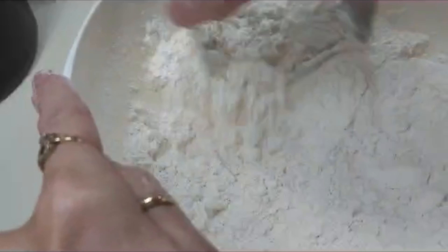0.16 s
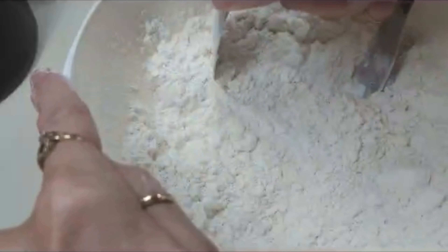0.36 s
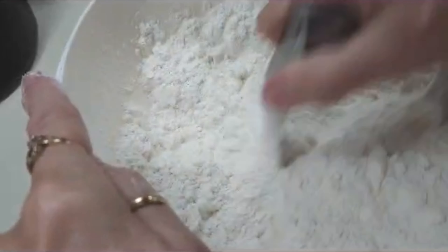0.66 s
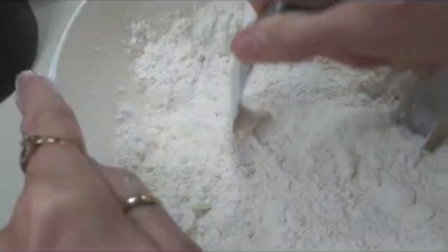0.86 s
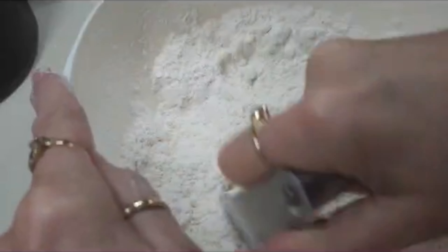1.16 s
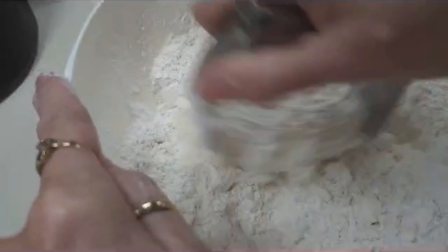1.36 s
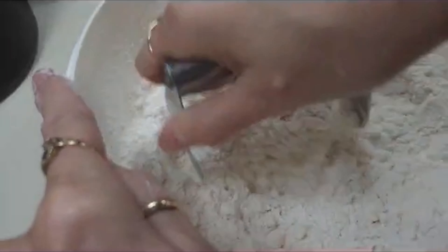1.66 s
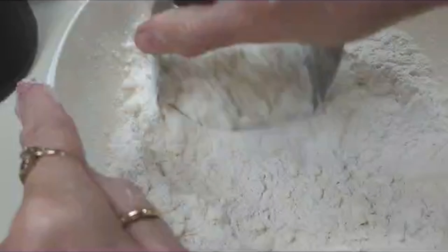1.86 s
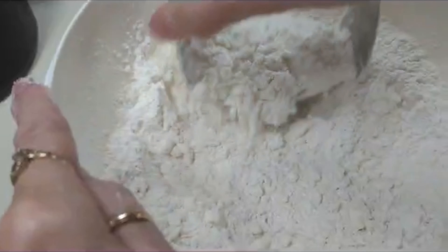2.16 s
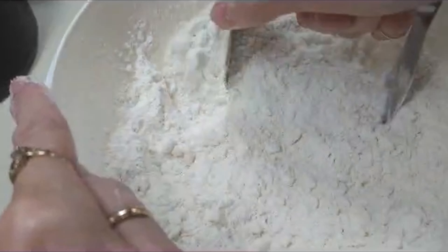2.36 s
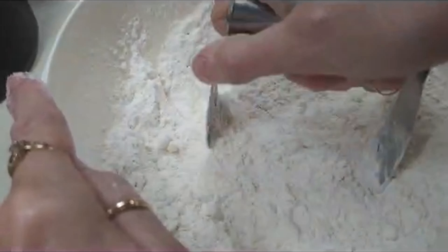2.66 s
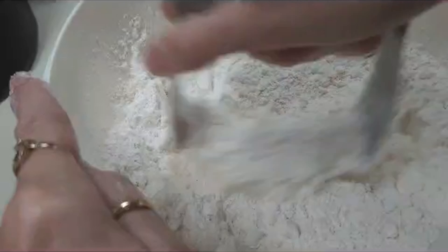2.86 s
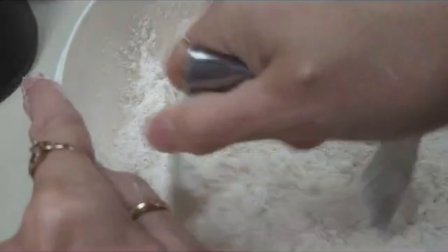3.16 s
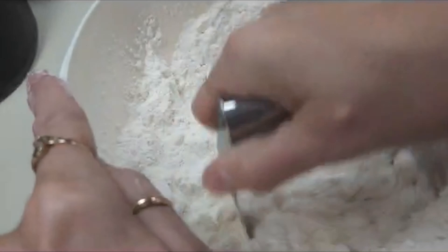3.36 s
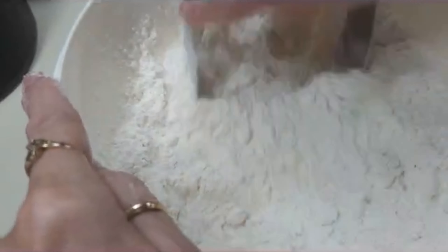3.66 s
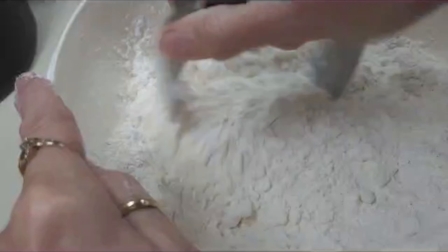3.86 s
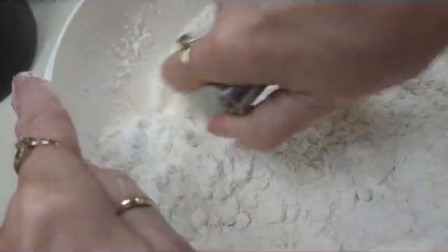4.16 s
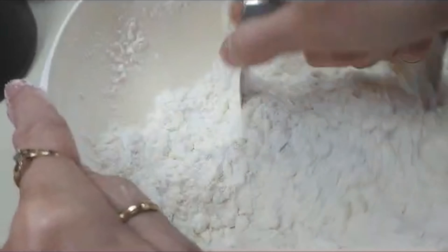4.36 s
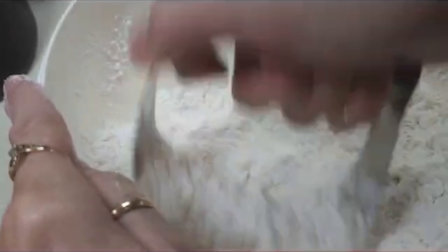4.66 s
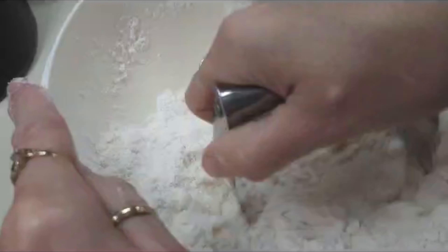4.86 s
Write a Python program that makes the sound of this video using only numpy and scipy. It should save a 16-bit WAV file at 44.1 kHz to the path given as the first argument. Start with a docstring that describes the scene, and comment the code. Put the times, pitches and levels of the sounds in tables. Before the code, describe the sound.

Close in a kitchen, metal blades crunch and rub through butter and flour, two heavy knocks early on, lighter strokes and a hissing scrape later.

```python
"""In a kitchen, heard from close by, a steel pastry blender cuts butter into flour in a hand-held bowl on a counter.
Gains for plunges and pushes drive grainy noise: squashed butter, crunching crumbs, hissing flour, with singing steel.
Blows on the bowl and blades are decaying modes with a noisy crack; thuds on the counter are slow damped swings.
Near the end the blades drag a long way through the flour and the bowl taps back into place.
A low rumble follows the load on the butter, and a short diffuse echo and quiet background surround it all."""
import sys
import numpy as np
from scipy import signal
from scipy.fft import rfft, irfft, next_fast_len
from scipy.io import wavfile

SR = 44100
rng = np.random.default_rng(int(sys.argv[2]) if len(sys.argv) > 2 else 0)


def wav_out(sig):
    """Save sig, one row per channel (or a flat mono array), as 16-bit PCM at SR to the path in sys.argv[1]."""
    wavfile.write(sys.argv[1], SR, np.round(np.clip(np.atleast_2d(sig).T, -1, 1) * 32767).astype(np.int16))


N = 221161
TIME = np.arange(N) / SR  # seconds
AGE = TIME[:SR // 2]  # seconds since a blow

# Modes of the loaded bowl. Each row: frequency in Hz, level in dB, full ring time (t60) in seconds.
BOWL_MODES = [(195, -1, 0.049), (240, -0.5, 0.11), (344.7, 0.5, 0.12), (382.7, -9.5, 0.099),
              (412, -20.5, 0.23), (432, -9.5, 0.15), (542.5, -3, 0.12), (670, -2.5, 0.058), (693, -5, 0.18),
              (787, -7, 0.19), (889, 1, 0.028), (1088, -16, 0.096), (1215, -2, .07), (1370, -4.5, 0.13)]
# Modes of the blades, damped by hand and dough. Each row: frequency in Hz, level in dB, full ring time (t60) in seconds.
BLADE_MODES = [(970, -7.5, 0.034), (1137, 1.5, 0.025), (1640, -12, 0.073), (1880, -1.5, 0.012),
               (2213, -14, 0.093), (2154, 6.5, 0.0091), (2430, -1.5, 0.02), (2650, -5.5, 0.02),
               (2847, -10.5, 0.1), (3060, -9.5, 0.018), (4050, -22.5, .03), (4670, 1, 0.013),
               (5500, 9.5, 0.0032), (6640, 3.5, 0.0069), (7260, -2.5, .015)]
# Colour of breaking crumbs. Each row: frequency in Hz, level in dB.
CRUNCH_COLOUR = [(400, -24), (620, -6), (820, -1.5), (1050, -1), (1400, -3), (1800, -2), (2150, -1),
                 (2600, -4), (3400, -9.5), (4800, -18)]
# How alike left and right are. Each row: frequency in Hz, likeness (1 = the same, 0 = unrelated).
EAR_LIKENESS = [(100, 1), (250, 0.96), (500, 0.59), (1000, 0.098), (2500, 0), (8000, 0), (15000, 0)]


def from_db(db):
    """Turns decibels into an amplitude factor."""
    return 10 ** (np.asarray(db) / 20)


def rms_one(x):
    """Scales a signal to rms 1."""
    return x / np.sqrt(np.mean(x ** 2) + 1e-20)


def attack_one(x):
    """Scales a blow to rms 1 over its first 5 ms."""
    return x / np.sqrt(np.mean(x[..., :SR // 200] ** 2) + 1e-20)


def at_hz(points, hz):
    """Reads a table of (Hz, value) at any frequency, on a logarithmic frequency scale."""
    table_hz, values = np.array(points)[:, :2].T
    return np.interp(np.log(np.maximum(hz, 1)), np.log(table_hz), values)


def band(x, low_hz, high_hz, order=2):
    """Keeps the band between two frequencies, at least a tenth of the lower one wide."""
    high_hz = min(max(high_hz, low_hz * 1.1), .47 * SR)
    return signal.sosfilt(signal.butter(order, [low_hz, high_hz], "band", fs=SR, output="sos"), x)


def add(out, s, sound):
    """Lays a sound into the mix at time s."""
    start = max(round(s * SR), 0)
    out[:, start:start + sound.shape[-1]] += sound[..., :N - start]


def panned(sound, left_db):
    """Makes the left louder than the right by left_db."""
    return sound * from_db([[left_db / 2], [-left_db / 2]])


def spread(pair, spectrum=None):
    """Two unrelated signals become left and right, alike in the bass and coloured by a spectrum; rms 1."""
    count = pair.shape[-1]
    size = next_fast_len(count)
    hz = np.arange(size // 2 + 1) * SR / size
    mid, side = rfft(pair, size)
    alike = np.clip(at_hz(EAR_LIKENESS, hz), -1, 1)
    both = np.sqrt(1 + alike) * mid + np.sqrt(1 - alike) * side * [[1], [-1]]
    if spectrum is not None:
        lowest_hz, highest_hz = spectrum[0][0], spectrum[-1][0]
        # beyond the ends of the table the level falls 12 dB per octave
        skirts = np.minimum(hz / lowest_hz, 1) ** 2 / np.maximum(hz / highest_hz, 1) ** 2
        both = both * from_db(at_hz(spectrum, hz)) * skirts
    return rms_one(irfft(both, size)[:, :count])


def background():
    """The quiet of the kitchen: steady noise, strongest in the bass."""
    # Each row: frequency in Hz, level in dB.
    background_colour = [(18, -40.5), (30, 6.5), (92, 4.5), (130, -2.5), (177, -21), (332, -14), (492, -34),
                         (808, -21), (1330, -30), (2360, -29), (3780, -42), (7860, -35.5), (15500, -59.5)]
    level_db = -56
    return from_db(level_db) * spread(rng.standard_normal((2, N)), background_colour)


def thuds(steepness=2.0):
    """The push of the hand swells into a few slow swings of the bowl on the counter, which the hands damp."""
    # Each row: start in seconds, peak level in dB, pitch in Hz, time to swell in seconds.
    thud_rows = [(.0, -29, 59.4, 0.005), (.115, -38, 60, 0.017), (0.333, -22.5, 68.5, 0.012),
                 (0.594, -36.5, 63, 0.013), (0.686, -6, 108.5, 0.0072), (0.7148, -21, 110, 0.012),
                 (1.171, -23.5, 53, 0.036), (1.1708, -4, 100, 0.0079), (1.599, -36, 77, 0.0026),
                 (2.001, -29, 72.5, 0.0082), (2.05, -36, 65, 0.012), (2.358, -19, 74.8, 0.0086),
                 (2.668, -25.5, 66, 0.016), (2.712, -18, 58, 0.024), (2.7146, -26.5, 116, 0.0085),
                 (3.088, -21.5, 50.8, 0.02), (3.471, -31, 58.5, 0.013), (3.563, -13, 78.3, 0.0058),
                 (3.7362, -18, 71, 0.0054), (3.818, -30, 54.6, .011), (3.86, -30, 61.6, 0.012),
                 (4.169, -36.5, 71.3, 0.0099), (4.628, -37, 88, 0.015)]
    out = np.zeros((2, N))
    for s, db, hz, swell_s in thud_rows:
        u = AGE / swell_s
        envelope = (u * np.exp(1 - u)) ** steepness  # reaches 1 at swell_s
        add(out, s, -from_db(db) * envelope * np.sin(2 * np.pi * hz * AGE))
    return out


def swell(s, swell_s, release_s):
    """Gain of a push that builds up to time s and lets go."""
    depth_db, curve = 25, 1.69  # level gained in the swell and lost in the release; 1 = pointed, 2 = rounded
    away = np.maximum((s - TIME) / swell_s, (TIME - s) / release_s)
    return from_db(-depth_db * np.minimum(away, 10) ** curve)


def plunge(s, t60):
    """Gain of a plunge that bites at time s and is braked by the mix."""
    attack_s = 0.008
    age = np.clip(TIME - s, 0, 3 * t60)
    return np.minimum(age / attack_s, 1) * from_db(-60 * age / t60)


def linger(gain, t60):
    """A gain that lags behind another and dies away after it, smoothed in power."""
    r = from_db(-120 / (t60 * SR))  # power falls by 120 on this scale, so the gain falls 60 dB
    return np.sqrt(signal.lfilter([1 - r], [1, -r], gain ** 2 + 1e-18))


def strokes():
    """Gains of squash, crunch and hiss from all plunges and pushes, with the loose mix that keeps falling after."""
    # Blades plunging into the mix. Each row: start in seconds, squash of butter in dB, crunch of crumbs in dB,
    # hiss of flour in dB, t60 in seconds.
    plunge_rows = [(.324, -29, -38.5, -41.5, 0.22), (.502, -55, -70, -71.5, 0.33),
                   (.679, -36, -36.5, -38, .27), (1.164, -25.5, -32, -43.5, 0.27),
                   (1.589, -57.5, -66.5, -58, 0.2), (1.973, -51, -57, -58, 0.38),
                   (2.04, -51.5, -61, -63.5, 0.14), (2.352, -45.5, -56.5, -64, 0.23),
                   (2.661, -50, -58.5, -71, 0.17), (2.711, -46, -62.5, -59.5, 0.1),
                   (3.335, -52.5, -62, -65, 0.27), (3.555, -32, -46, -64.5, 0.099),
                   (3.724, -29, -32, -40.5, 0.23), (3.85, -52, -56, -68.5, .3)]
    # Blades pushing on through it. Each row: firmest moment in seconds, swell in seconds, release in seconds,
    # squash in dB, crunch in dB, hiss in dB.
    push_rows = [(.055, 0.059, 0.095, -47, -52.5, -50), (.19, 0.056, .04, -62.5, -63, -85),
                 (0.311, 0.053, 0.041, -48, -58, -60.5), (.44, .07, 0.089, -60.5, -70.5, -63.5),
                 (.59, 0.038, .03, -57, -62.5, -74), (.8, 0.13, 0.062, -39, -43.5, -47.5),
                 (0.909, 0.067, 0.024, -41, -46.5, -49), (1.346, 0.06, 0.055, -41, -48, -53),
                 (1.582, 0.017, .02, -66.5, -66, -74), (1.651, 0.022, .07, -72, -75.5, -56.5),
                 (1.741, 0.061, 0.039, -43.5, -48, -49), (1.871, 0.13, 0.057, -53, -52.5, -59),
                 (2.125, 0.076, 0.12, -61.5, -60.5, -60.5), (2.25, 0.066, .07, -64, -71, -87),
                 (2.429, 0.1, 0.07, -49, -59, -56), (2.59, .04, 0.069, -65, -69, -78),
                 (2.85, .04, 0.087, -57, -63, -63.5), (3.084, .04, 0.021, -50, -61.5, -62),
                 (2.945, 0.037, 0.027, -61, -82, -82), (3.185, .06, .07, -50, -55.5, -57.5),
                 (3.454, 0.064, 0.068, -52.5, -54.5, -51.5), (3.695, 0.022, 0.057, -72.5, -73, -58),
                 (3.782, 0.072, 0.055, -41, -44, -45.5), (4.015, .06, .06, -70.5, -78, -72),
                 (4.138, 0.028, .045, -47, -46.5, -46.5), (4.88, 0.13, 0.29, -60.5, -60.5, -58),
                 (4.988, 0.12, 0.063, -57.5, -54.5, -55.5)]
    # The falling mix, against the move. The values: squash in dB, crunch in dB, hiss in dB.
    trickle_db = [-18.5, -23, -27.5]
    trickle_t60_s = 0.34
    moves = [(plunge(s, t60), levels) for s, *levels, t60 in plunge_rows]
    moves += [(swell(s, up, down), levels) for s, up, down, *levels in push_rows]
    shapes, levels_db = zip(*moves)
    gains = np.sqrt(from_db(levels_db).T ** 2 @ np.array(shapes) ** 2)  # moves add in power
    trickle = from_db(trickle_db)[:, None] * linger(gains, trickle_t60_s)
    return np.hypot(gains, trickle)


def grains(per_s, size_db, smooth):
    """Crumbs break at random moments with uneven sizes, over the smooth rub of powder."""
    sizes = from_db(size_db * np.minimum(rng.exponential(1, N), 3))
    breaks = (rng.random(N) < per_s / SR) * sizes
    return rms_one(breaks * rng.standard_normal((2, N))) + smooth * rng.standard_normal((2, N))


def sing(drive, modes):
    """Steady rubbing keeps the modes of a body ringing, one resonator each; rms 1."""
    out = 0
    for hz, db, t60 in modes:
        r = from_db(-60 / (t60 * SR))
        w = 2 * np.pi * hz / SR
        out = out + from_db(db) * signal.lfilter([1 - r, 0, r - 1], [1, -2 * r * np.cos(w), r * r], drive)
    return rms_one(out)


def flutter(per_s):
    """A random swell and fall, per_s new targets a second; rms 1."""
    count = int(N / SR * per_s) + 2
    return rms_one(np.interp(TIME * per_s, np.arange(count), rng.standard_normal(count)))


def lumpy(noise, lumps_db, per_s):
    """Lumps of different sizes pass the blades, each stirring its own part of the spectrum."""
    size = next_fast_len(N)
    whole = rfft(noise, size)
    octave = np.log2(np.maximum(np.arange(size // 2 + 1) * SR / size, 1))
    centres = np.linspace(np.log2(300), np.log2(16000), 24)
    out = 0
    for share in np.eye(len(centres)):
        part = irfft(whole * np.interp(octave, centres, share), size)[:, :N]
        out = out + part * from_db(lumps_db * flutter(per_s))
    return out * np.std(noise) / np.std(out)


def cutting(gains, blade_ring_db=-7.5):
    """The blades squash butter, break crumbs and rub through fine flour, ringing faintly as they go."""
    # Colour of squashed butter. Each row: frequency in Hz, level in dB.
    squash_colour = [(90, -24.5), (160, -8), (230, 2.5), (290, -1), (350, -1.5), (500, -10.5), (620, -8),
                     (900, -24)]
    # Colour of fine flour. Each row: frequency in Hz, level in dB.
    hiss_colour = [(2600, -4.5), (3800, -3), (4400, -3), (5500, -4.5), (6700, -9), (7450, -4.5),
                   (8400, -8.5), (10500, -12), (13000, -9.5), (15300, -12.5), (16000, -12.5)]
    squash_gain, crunch_gain, hiss_gain = gains
    squash = squash_gain * spread(grains(900, 4.0, .8), squash_colour)
    crumbs = spread(grains(1800, 3.0, 1.0), CRUNCH_COLOUR)
    ringing = from_db(blade_ring_db) * sing(spread(grains(1200, 3.0, 0.93), CRUNCH_COLOUR), BLADE_MODES)
    crunch = crunch_gain * panned(crumbs + ringing, left_db=2.5)
    hiss = hiss_gain * spread(grains(5000, 0.83, 1.0), hiss_colour)
    return lumpy(squash + crunch + hiss, lumps_db=2.5, per_s=90)


def snaps(crunch_gain):
    """Hard crumbs snap at random on the wires, tick against the blades, and go on briefly after each move."""
    crumbs_per_s, level_db, t60_s = 200, -8.5, .15  # level against the crunch
    ticks = sing(spread(grains(crumbs_per_s, 5.0, 0), CRUNCH_COLOUR), BLADE_MODES)
    return from_db(level_db) * linger(crunch_gain, t60_s) * ticks


def bowl_ring(load):
    """Butter giving way under the blades stirs the modes of the bowl."""
    level_db = -8.5  # against the squash
    return from_db(level_db) * load * sing(spread(grains(500, 5.2, .5), CRUNCH_COLOUR), BOWL_MODES)


def rocking(load):
    """Pressing on the butter shifts the bowl on the counter with a low rumble, over that of the holding hands."""
    # Each row: frequency in Hz, level in dB.
    rumble_colour = [(18, -34), (35, -11.5), (55, 3.5), (80, -11.5), (110, -2.5), (160, -15), (300, -38)]
    rock_db, load_db, hands_db = -41.5, -49.5, -55  # rumble at a steady load of load_db; rumble of the hands
    follows, settle_t60_s = .55, 0.14  # share of the load's swing in dB; lag of the load
    pushed = from_db(rock_db) * (linger(load, settle_t60_s) / from_db(load_db)) ** follows
    return np.hypot(pushed, from_db(hands_db)) * spread(rng.standard_normal((2, N)), rumble_colour)


def dying(t60):
    """Exponential decay of 60 dB in t60 seconds."""
    return from_db(-60 * AGE / t60)


def struck(modes, ring, skew):
    """Each blow excites the modes anew, and each mode reaches the two ears a little differently."""
    out = 0
    for hz, db, t60 in modes:
        unlike = np.sqrt(1 - np.clip(at_hz(EAR_LIKENESS, hz), -1, 1))
        apart = skew * unlike * rng.standard_normal() * np.array([[1], [-1]])  # phase in radians
        strength = from_db(db + 2.5 * rng.standard_normal())
        out = out - strength * dying(t60 * ring) * np.sin(2 * np.pi * hz * AGE + apart)
    return attack_one(out)


def crack(t60):
    """The short noisy burst of a contact."""
    return attack_one(spread(rng.standard_normal((2, len(AGE)))) * dying(t60))


def clinks(crack_db=0.0):
    """Bare steel touches the bowl or other blades: a sharp tick and a brief ring of the blades."""
    # Each row: start in seconds, level in dB, centre in Hz, bandwidth in octaves, multiple of the full ring time.
    clink_rows = [(0.0533, -38.5, 2110, 0.73, 2.5), (0.2957, -49, 2500, 0.44, .41),
                  (0.3137, -45.5, 2600, 1.1, 0.78), (0.413, -55.5, 6500, 1.9, 0.69),
                  (.6805, -24.5, 1450, 1.64, 1.16), (0.683, -34, 4500, 0.34, 0.31),
                  (1.1683, -21, 2470, 1.44, 0.54), (1.168, -30, 8900, 1.9, 0.38),
                  (1.172, -21, 1040, 1.4, 1.1), (1.1773, -32.5, 2970, 2.1, 1.2),
                  (1.474, -59, 5800, 1.4, 0.53), (1.5865, -44, 2630, 0.87, 0.51),
                  (1.973, -47, 3070, 2.75, 0.32), (2.046, -54.5, 2400, 2.1, .35),
                  (2.32, -59, 2510, 0.74, 0.44), (2.334, -55, 6180, 1.95, 1.15),
                  (2.3976, -46.5, 5970, 1.22, 0.55), (2.654, -56.5, 5240, 1.46, 0.45),
                  (2.7108, -48, 4920, 8.9, 0.74), (3.057, -55, 2440, 0.29, 0.32),
                  (3.3374, -38, 2880, 1.6, 0.27), (3.5558, -35, 1130, 1.55, 0.25),
                  (3.7258, -26, 2245, 2.1, 0.51), (3.77, -31, 2130, 0.55, 1.2),
                  (3.807, -45, 4300, 0.38, 0.56), (3.853, -53.5, 6770, 0.89, 0.44),
                  (3.9336, -62, 1930, 2.2, 0.21), (4.1193, -43, 6760, 4.4, 0.55),
                  (4.127, -43.5, 2120, 0.22, 2.1), (4.1953, -47, 6900, 3.4, 1.5),
                  (4.231, -42, 5600, 2.4, 4.3), (4.812, -54, 1700, 1.2, 0.97),
                  (4.8607, -52.5, 5040, 1.9, 0.23)]
    out = np.zeros((2, N))
    for s, db, hz, octaves, ring in clink_rows:
        blow = struck(BLADE_MODES, ring, skew=0.98) + from_db(crack_db) * crack(t60=0.097 * ring)
        reach = 2 ** (octaves / 2)
        add(out, s, from_db(db) * attack_one(band(blow, hz / reach, hz * reach)))
    return out


def knocks(crack_db=0.0):
    """Blades hit bottom or wall, or the bowl settles; butter softens and damps it, so fewer modes ring."""
    # Each row: start in seconds, level in dB, lowest frequency in Hz, contact hardness (upper limit) in Hz,
    # share of the full ring time, left over right in dB.
    knock_rows = [(0.3286, -36, 149, 410, 0.61, 12.5), (0.597, -42.5, 150, 325, 0.37, 0),
                  (.681, -23, 151, 270, 0.48, 2.5), (.713, -31, 250, 880, 1, -3.5),
                  (.765, -39.5, 480, 730, 1, -2.5), (.808, -36.5, 500, 920, 0.9, -1),
                  (1.162, -23, 148, 450, 0.28, 8), (1.1682, -8, 216, 653, 0.28, 3),
                  (1.173, -13, 192.8, 636, 0.91, -4.5), (1.18, -26.5, 500, 1389, 0.92, 6.5),
                  (1.31, -38, 258, 812, 1, 3), (1.5852, -50, 753, 1270, 0.24, 9.5),
                  (1.941, -60, 300, 1500, 0.36, -1), (1.995, -46.5, 152, 350, 0.57, -0.5),
                  (2.354, -33.5, 188, 422, 0.55, -1.5), (2.66, -38, 210, 380, 0.68, 0.5),
                  (2.956, -49.5, 199.5, 390, 0.36, 0.5), (3.078, -45, 210, 1330, 0.43, 3),
                  (3.333, -43.5, 615, 1160, 0.38, 2.5), (3.5566, -25.5, 140, 473, 0.31, 2),
                  (3.7277, -23, 145, 259, 0.38, 2), (3.931, -53.5, 498, 1380, 0.28, 4),
                  (4.119, -42, 720, 1260, 0.84, 9), (4.129, -40, 775, 990, 0.59, 7.5),
                  (4.5462, -37, 352, 928, 0.28, -6), (4.586, -39.5, 460, 930, 0.38, -1),
                  (4.63, -38.5, 146, 326, 0.44, 1), (4.734, -56, 790, 1380, 0.63, 1),
                  (4.797, -53, 205, 600, 0.83, -7)]
    out = np.zeros((2, N))
    for s, db, low_hz, hard_hz, ring, left_db in knock_rows:
        blow = struck(BOWL_MODES, ring, skew=1.0) + from_db(crack_db) * crack(t60=0.08 * ring)
        knock = from_db(db) * attack_one(band(blow, low_hz, hard_hz))
        add(out, s, panned(knock, left_db))
    return out


def drag():
    """Gains of squash, crunch and hiss in the long drag along the wall: one pressure drives all three."""
    # Each row: time in seconds, crunch in dB.
    drag_points = [(4.17, -73), (4.2, -57.5), (4.222, -53), (4.24, -39.5), (4.29, -46.5), (4.35, -47.5),
                   (4.4, -42), (4.51, -47), (4.54, -72), (4.66, -82)]
    squash_db, hiss_db = -6, -1.5  # against the crunch
    s, level_db = np.transpose(drag_points)
    pressure = from_db(np.interp(TIME, s, level_db)) * (TIME > s[0]) * (TIME < s[-1])
    return np.array([from_db(squash_db) * pressure, pressure, from_db(hiss_db) * pressure])


def sliding():
    """Steel rubbing on the wall sings in the long drag and fades as the blades lift."""
    # Each row: frequency in Hz, level in dB, ring time (t60) in seconds.
    slide_modes = [(916, 1, 0.019), (1610, -5, 0.014), (2154, 1.5, 0.033), (3080, -13.5, 0.024),
                   (5100, -14, 0.016), (5700, -11, 0.019)]
    level_db = -49.5
    gain = from_db(level_db) * swell(4.455, swell_s=.25, release_s=0.25)
    return gain * sing(spread(grains(1000, 2.1, 0.55)), slide_modes)


def kitchen(x, build_up_s=0.039):
    """A short diffuse tail that builds up softly and dies soonest in the lower treble."""
    # Each row: frequency in Hz, decay time (t60) in seconds.
    room_decay = [(150, 0.3), (500, 0.27), (2000, 0.21), (6000, 0.19), (14000, 0.32)]
    noise = spread(rng.standard_normal((2, len(AGE))))
    edges = np.geomspace(130, 16000, 8)
    tail = 0
    for low, high in zip(edges, edges[1:]):
        tail = tail + band(noise, low, high) * dying(at_hz(room_decay, np.sqrt(low * high)))
    tail = tail * np.minimum(AGE / build_up_s, 1) ** 2
    tail = tail / np.sqrt(np.sum(tail ** 2) / 2)  # unit energy per ear on average
    return signal.fftconvolve(x, tail, axes=1)[:, :N]


def scene():
    """Blows and cutting in the bowl with their echo, thuds and rumble without, and the quiet of the kitchen."""
    gains = strokes()
    load, crunch_gain, _ = gains  # the squash gain is the load on the butter
    blows = knocks() + clinks()
    mix = cutting(np.hypot(gains, drag())) + snaps(crunch_gain) + bowl_ring(load) + sliding()
    echo = kitchen(from_db(-17.0) * blows + from_db(-14.5) * mix)
    return blows + mix + thuds() + rocking(load) + echo + background()


def record(dry):
    """The loudest peaks are rounded, the rest turned down slightly, and the top is cut."""
    cutoff_hz = 15650
    rounded = 1.267 * np.tanh(dry / 1.364)
    return signal.sosfilt(signal.ellip(10, .1, 80, cutoff_hz, fs=SR, output="sos"), rounded)


dry = scene()
out = record(dry)
wav_out(out)
```